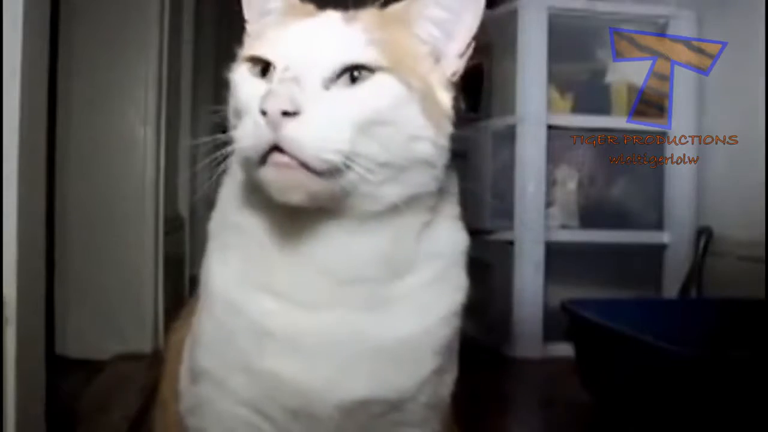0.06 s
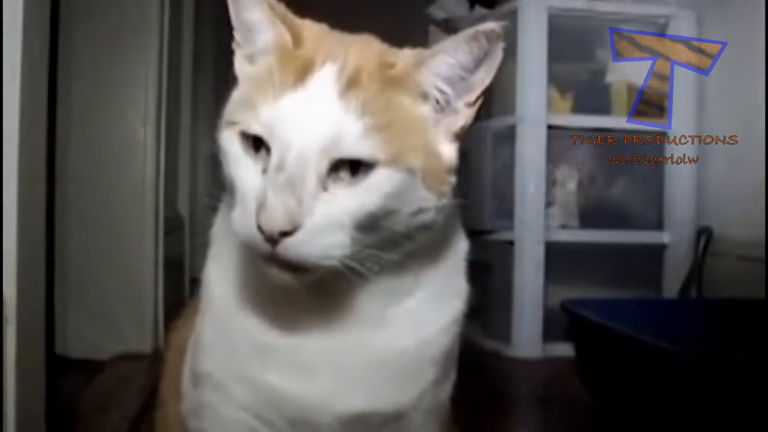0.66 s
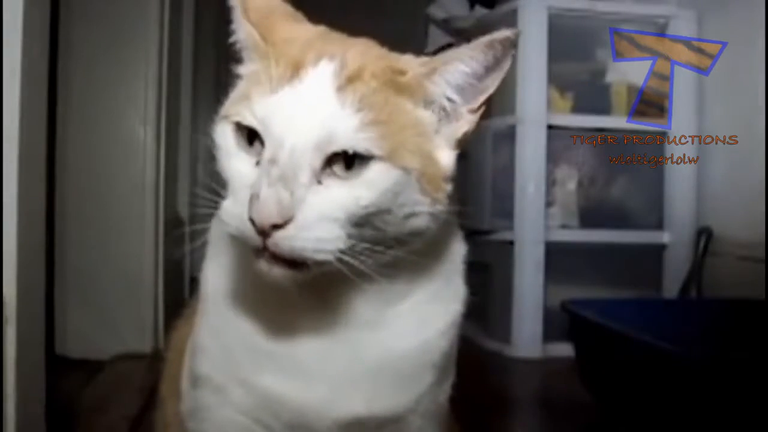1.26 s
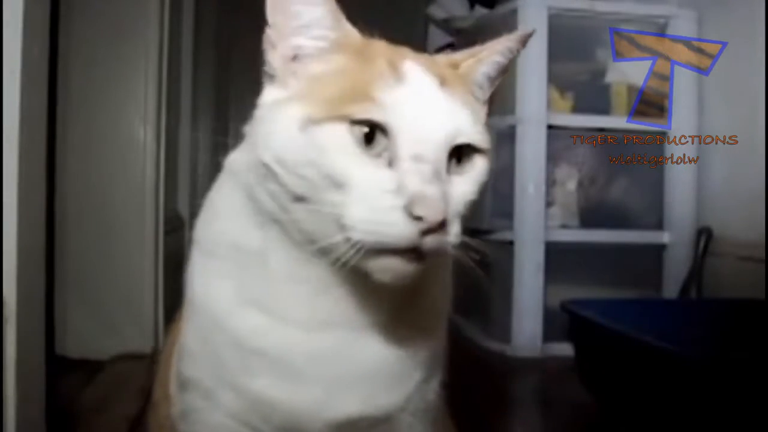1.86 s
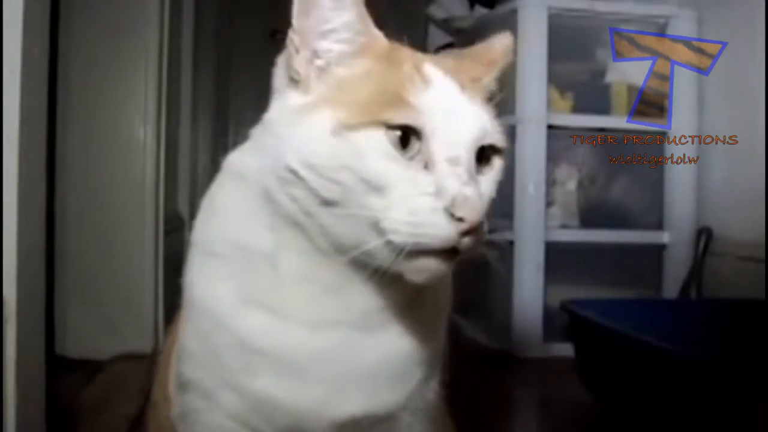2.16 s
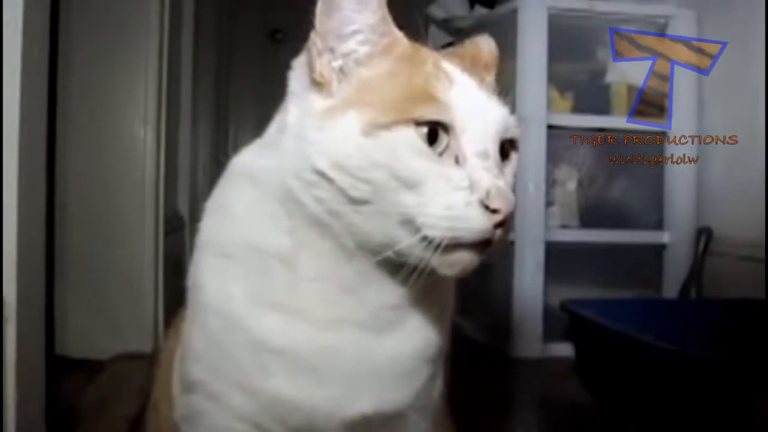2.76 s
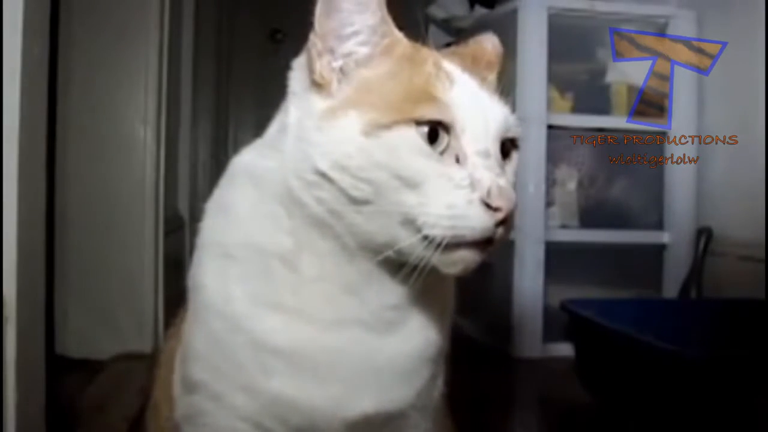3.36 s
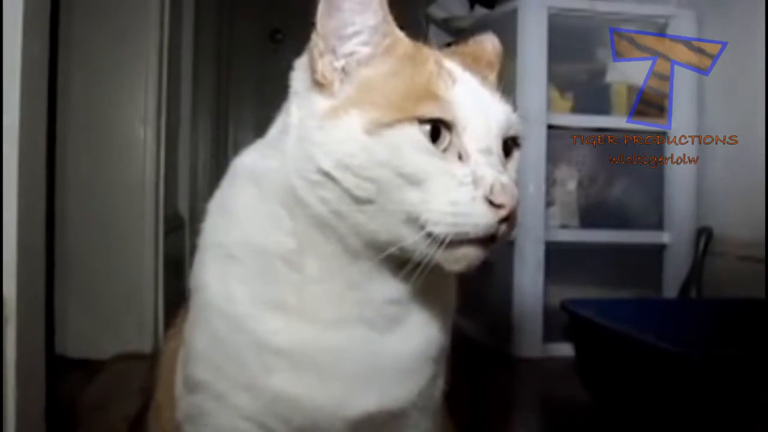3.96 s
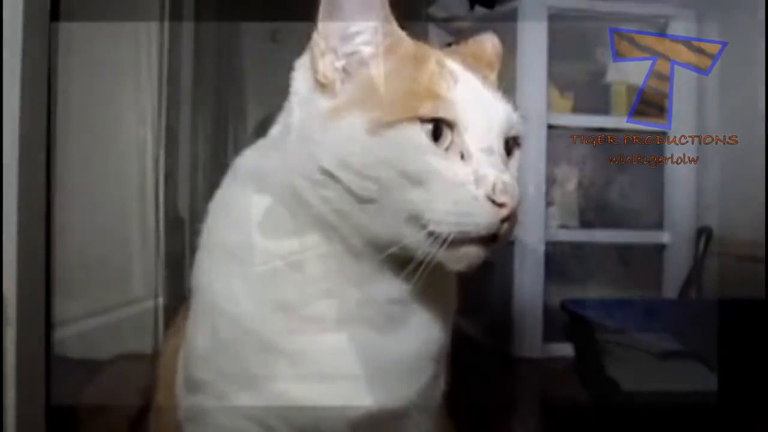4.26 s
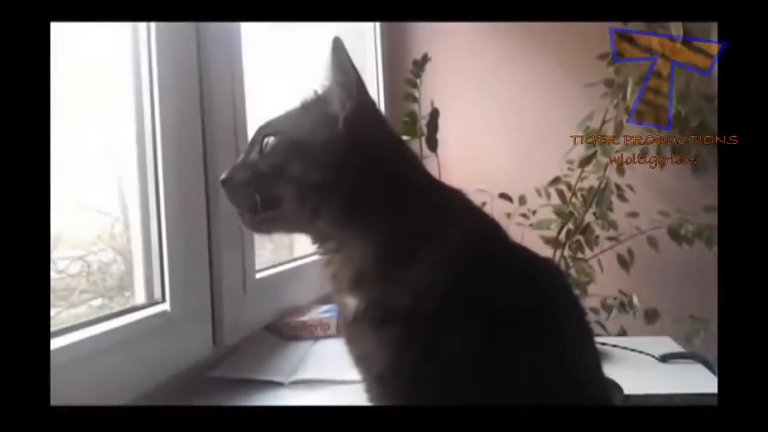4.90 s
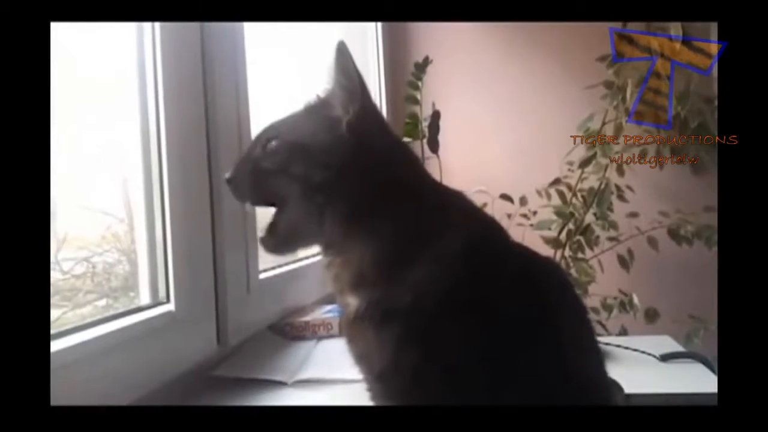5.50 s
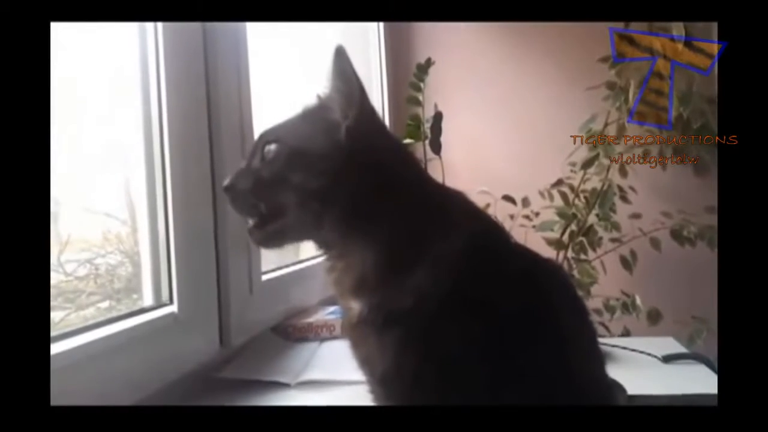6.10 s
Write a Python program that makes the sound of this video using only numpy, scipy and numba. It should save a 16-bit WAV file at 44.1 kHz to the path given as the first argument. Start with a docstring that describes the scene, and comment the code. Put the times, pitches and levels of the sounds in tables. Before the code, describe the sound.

A soft, breathy hiss opens over the low electrical hum of a small room. At about 0.25 seconds a nearby cat spits and starts one long, low yowl with a fluttering growl running through it. The pitch climbs until about 0.7 seconds and wavers. Around 1.2 to 1.5 seconds it drops into a brighter, raspier snarl, then turns low and muffled. It rises again near 1.9 seconds, makes two small "ow" shapes at about 2 and 2.5 seconds, and holds, gradually weakening, until it ends with a faint lip click at 3.9 seconds. From about 4.3 seconds the hum gives way to a wider, hissier room. There a second cat chatters more quietly: three short, high chirps between 4.3 and 4.9 seconds, a soft low bump at 5.4, then three more quick chirps from 5.8 to 6.2 seconds.

```python
"""A soft hiss over the mains hum of a small room, then a nearby cat spits and gives one long, low yowl.
Its vocal folds make the note, and a second, slower vibration in its voice box turns it into a growl.
Midway the jaw opens in a snarl, which makes the sound brighter and raspier.
The scene then fades to a hissier room, where another cat chatters at a window in short, high chirps."""
import sys
import numpy as np
from scipy import signal
from scipy.fft import rfft, irfft, next_fast_len
from scipy.io import wavfile
from scipy.ndimage import uniform_filter1d
from numba import njit

SR = 44100
rng = np.random.default_rng(int(sys.argv[2]) if len(sys.argv) > 2 else 0)


def to_wav(sig):
    """Store sig (one row per channel, or 1-D mono) as 16-bit WAV at the path in sys.argv[1].

    Samples outside -1..1 are clipped; the rate is SR.
    """
    pcm = np.clip(np.atleast_2d(sig), -1, 1) * 32767
    pcm = np.round(pcm).astype(np.int16)
    wavfile.write(sys.argv[1], SR, pcm.T)  # frames by channels


N = 275287
TIME = np.arange(N) / SR

# hum and faint whines of the first room (frequency [Hz], relative level [dB])
HUM_TONES = [(59.2, -37), (382.2, -50), (769.8, -55), (1152, -51.5), (1416, -63), (3472, -64.5),
             (4027, -75.5), (5534, -73), (6541, -79)]
# background noise of the first room and of the window room (frequency [Hz], relative level [dB])
FIRST_ROOM_NOISE = [(15, -5), (30, 0), (100, -2), (200, -5), (400, -11), (800, -13.5), (1400, -18.5),
                    (2000, -24.5), (3600, -25.5), (4500, -35.5), (15000, -39.5)]
WINDOW_ROOM_NOISE = [(15, -9.5), (60, -2.5), (140, -4), (300, -3), (600, -7.5), (1000, -13), (2000, -18.5),
                     (6000, -20.5), (15500, -24.5)]
# breath through the teeth (frequency [Hz], relative level [dB])
HISS_SPECTRUM = [(410, -26), (700, -2), (783, -6), (1460, -1), (1730, -11), (2130, 0), (2890, -14),
                 (3540, -10.5), (8000, -29), (10400, -59), (17600, -120)]
# tune of the yowl (time [s], pitch [Hz])
YOWL_PITCH = [(0.24, 112.6), (0.275, 135), (0.32, 141.3), (0.42, 203), (0.56, 233), (0.66, 309),
              (0.76, 292), (0.99, 274), (1.14, 283), (1.23, 235), (1.37, 197), (1.7, 206), (1.84, 231),
              (1.89, 272), (2.05, 285), (2.44, 285), (2.59, 263), (2.74, 274), (3.05, 278), (3.36, 290),
              (3.52, 276), (3.59, 260), (3.7, 256), (3.77, 230), (3.87, 232), (3.9, 185)]
# effort behind the yowl (time [s], chest level [dB], throat level [dB])
YOWL_EFFORT = [(0.23, -31, -49), (0.28, -6.5, -30), (0.38, -6.5, -30.5), (0.41, -10, -19),
               (0.57, -19.5, -12.5), (0.63, -10.5, -13), (0.68, -15.5, -15.5), (1.14, -11.5, -15),
               (1.17, -11, -10), (1.21, -20.5, -22), (1.39, -14, -27), (1.82, -17.5, -19.5),
               (1.87, -16.5, -16.5), (1.9, -10, -17), (1.98, -12.5, -12), (2.06, -15, -15.5),
               (2.41, -15.5, -17.5), (2.54, -14, -9.5), (2.61, -18, -11.5), (2.78, -15, -14.5),
               (3.24, -17, -22.5), (3.53, -15.5, -21.5), (3.59, -22, -21), (3.88, -22.5, -27.5)]
# the jaw: partly open, wide in the snarl, then two small "ow"s (time [s], opening [0 shut, about 1 wide])
JAW_OPENING = [(0.25, 0.26), (0.38, 0.29), (0.47, 0.5), (0.6, 0.39), (0.76, 0.25), (1.13, 0.15),
               (1.18, 0.7), (1.28, 1.05), (1.4, 0.9), (1.5, 0.4), (1.6, .06), (1.86, 0.15), (1.99, 0.36),
               (2.12, 0.3), (2.46, .24), (2.53, 0.41), (2.66, 0.33), (2.77, 0.18), (3.3, 0.12), (3.7, 0)]
# the mouth's three resonances, the frequencies it boosts
# (shut [Hz], wide open [Hz], curve between them [exponent], delay behind the jaw [s])
MOUTH_RESONANCES = [(816, 1024, 2.3, 0.071), (1747, 2600, 0.83, 0.0044), (3187, 4240, 1.71, .04)]
# the spit's hiss, its ring, the lips closing, a soft bump by the window
# (start [s], centre [Hz], width [Hz], decay [s], level [dB])
BURSTS = [(.242, 4980, 11000, 0.095, -43), (.25, 5520, 500, .11, -37), (3.885, 1980, 2400, 0.0054, -39),
          (5.38, 128, 40, 0.053, -30)]
# the second cat's chirps (start [s], crest [s], fade start [s], base pitch [Hz], glide [Hz/s],
# relative level [dB], swell at the crest [dB], rasp [0-1], hardness of the start [0-1])
CHIRP_NOTES = [(4.345, 4.443, 4.48, 532.3, 549, -42, 7.5, 0.39, 0),
               (4.598, 4.658, 4.7, 440.8, -39.5, -30, 3, 0.29, 0.98),
               (4.817, 4.865, 4.903, 460.4, -200, -27, 9, 0.24, .65),
               (5.848, 5.869, 5.924, 479.7, 300.5, -23.5, 4, .68, .6),
               (6.057, 6.114, 6.130, 546.5, 552, -30.5, 0, .18, 0),
               (6.133, 6.227, 6.2, 540, 4, -40.5, 3.5, 0.21, 0.04)]
# how its throat and mouth colour them (frequency [Hz], relative level [dB])
CHIRP_SPECTRUM = [(200, -14), (480, -18.5), (700, -31), (1000, -8), (1400, -16), (1980, 2), (2300, -6.5),
                  (2750, 0), (3300, -20), (4500, -28.5), (5900, -19), (7100, -16.5), (8500, -31),
                  (15000, -53)]

SPIT_START_S, SPIT_HOLD_S, SPIT_FADE_S = .24, .0801, .13


def undb(db):
    """Turn decibels into a gain to multiply by."""
    return 10 ** (np.asarray(db) / 20)


def curves(table):
    """Join each column of a table with straight lines in time."""
    times, *columns = np.transpose(table)
    return [np.interp(TIME, times, column) for column in columns]


def unit(x):
    """Scale to an average (rms) level of 1."""
    return x / np.sqrt(np.mean(x ** 2))


def even(x, span_s=.12):
    """Hold the level near 1 but keep the fast flutter."""
    size = int(span_s * SR)
    power = uniform_filter1d(uniform_filter1d(x ** 2, size), size)
    return x / np.sqrt(np.abs(power) + 1e-14)


def ramp(start_s, length_s):
    """Rise in a straight line from 0 to 1."""
    return np.clip((TIME - start_s) / length_s, 0, 1)


def dying(start_s, decay_s):
    """Stay at 1 until the start, then die away."""
    return np.exp(-np.maximum(TIME - start_s, 0) / decay_s)


def drift(rate):
    """Wander at random by about 1, turning `rate` times a second."""
    size = max(int(SR / rate), 1)
    steps = np.repeat(rng.standard_normal(N // size + 1), size)
    return unit(uniform_filter1d(steps, size)[:N])


@njit
def band_pass(x, tuning, damping):
    """Let through one band of frequencies, which may move."""
    out, band, low = np.empty(len(x)), 0., 0.
    for i in range(len(x)):
        g = tuning[i]
        swing = (band + g * (x[i] + 1e-18 - low)) / (1 + g * (g + damping[i]))
        band, low = 2 * swing - band, low + 2 * g * swing
        out[i] = damping[i] * swing
    return out


def resonance(x, hz, width_hz):
    """Pick out a band twice, so its edges are steep."""
    hz = np.clip(hz * np.ones(N), 20, .45 * SR)
    tuning, damping = np.tan(np.pi * hz / SR), width_hz / hz
    return band_pass(band_pass(x, tuning, damping), tuning, damping)


def keep_side(x, hz, side, order=4):
    """Keep what lies on the "low" or "high" side of a frequency."""
    return signal.sosfilt(signal.butter(order, hz, side, fs=SR, output="sos"), x)


def shaped(x, spectrum):
    """Colour a sound with a table of (frequency [Hz], level [dB])."""
    hz, db = np.transpose(spectrum)
    size = next_fast_len(N, True)
    bins_hz = np.maximum(np.fft.rfftfreq(size, 1 / SR), 1)
    gain = undb(np.interp(np.log(bins_hz), np.log(hz), db))
    return irfft(rfft(x, size) * gain, size)[:N]


def noise():
    """Plain white noise."""
    return rng.standard_normal(N)


def coloured(spectrum):
    """Noise at level 1 with the given spectrum."""
    return unit(shaped(noise(), spectrum))


def hiss():
    """Soft breath through the teeth, which stops as the yowl begins."""
    return undb(-40) * coloured(HISS_SPECTRUM) * (1 - ramp(.19, .058))


def first_room():
    """Mains hum and faint whines waver over low noise, then fade out."""
    wavering_time = TIME + .0006 * np.cumsum(drift(8.4)) / SR
    hum = sum(np.sqrt(2) * undb(db) * np.sin(2 * np.pi * hz * wavering_time) for hz, db in HUM_TONES)
    return (undb(2) * hum + undb(-40.5) * coloured(FIRST_ROOM_NOISE)) * (1 - ramp(4.6, .07))


def vocal_folds(phase, rasp, harmonics=24):
    """The folds buzz in sharp pulses, with a puff of rushing air in each cycle; more rasp is more air."""
    half = phase / 2 % np.pi + 1e-6
    pulses = unit(np.sin((2 * harmonics + 1) * half) / np.sin(half) - 1)
    air = unit(noise() * (1 + .31 * np.cos(phase)))
    rasp = np.clip(rasp, 0, 1)
    return pulses * np.sqrt(1 - rasp ** 2) + 1.6 * air * rasp


def voice_box(hz):
    """Rate, depth and rasp of the growl: on low notes the folds go slack and beat faster and deeper."""
    slack_below_hz, taut_rate_hz, slack_rate_hz = 244.5, 49.2, 57.16
    slack = .5 + .5 * np.tanh((slack_below_hz - hz) / 14)
    spit = dying(SPIT_START_S + SPIT_HOLD_S, SPIT_FADE_S)
    ease = 1 - .75 * ramp(3.03, .099) * (1 - .63 * slack)  # the breath runs out
    snarl = curves(JAW_OPENING)[0] ** 2
    rate_hz = taut_rate_hz + (slack_rate_hz - taut_rate_hz) * slack + 6 * np.sqrt(spit)
    depth = (.35 + .61 * slack) * ease * (1 - .7 * spit)
    rasp = .13 * (1 + slack) * np.sqrt(ease) + .7 * spit + .16 * snarl
    return rate_hz, depth, rasp


def jaw():
    """Two levels and three resonances of the mouth: opening it lets more out and tunes it higher."""
    opening = np.maximum(curves(JAW_OPENING)[0], .01)
    bared_teeth = dying(SPIT_START_S + SPIT_HOLD_S, SPIT_FADE_S)
    spit = undb(-30) * bared_teeth * ramp(SPIT_START_S - .003, .005)
    onset = ramp(SPIT_START_S, .01)
    parted = .5 + .5 * np.tanh((opening - .32) / .054)  # the treble jumps out as the lips part
    mid_gain = undb(-14.5) * opening ** 1.6 * onset
    bright_gain = undb(-36 + 5 * parted) * opening ** 1.204 * onset
    levels_db = [20 * np.log10(gain + 1e-6) for gain in (mid_gain, np.hypot(bright_gain, spit))]
    lips = opening + .36 * bared_teeth
    resonances_hz = [shut + (wide - shut) * np.interp(TIME - delay, TIME, lips) ** curve
                     for shut, wide, curve, delay in MOUTH_RESONANCES]
    return levels_db, resonances_hz


def chest(phase, growl, depth, rasp):
    """The deepest tone throbs in uneven strokes over a little breath noise."""
    throb = np.exp(.85 * depth ** 2 * (np.cos(growl) + .2 * drift(110)))
    breath = (.036 + .11 * rasp) * unit(resonance(noise(), 160, 290))
    return even(keep_side(np.cos(phase) * throb + breath, 82, "high"))


def throat_and_nose(buzz, hz, phase, rasp):
    """The throat's resonance rises with the pitch; faint clean overtones pass through the nose."""
    throat = keep_side(resonance(buzz, 315 + .7 * hz, 190), 682, "low")
    breath = .6 * rasp * unit(resonance(noise(), 505, 110))
    nose = resonance(vocal_folds(phase, rasp=0, harmonics=10), 1560, 600)
    return even(throat) + breath + undb(-32) * even(nose)


def mouth(buzz, rough_buzz, rasp):
    """The mouth shapes the buzz into a vowel, and the rougher buzz into a bright rasp above it."""
    (mid_db, bright_db), (first_hz, second_hz, third_hz) = jaw()
    mid = keep_side(resonance(buzz, first_hz, 220), 705, "high", order=6)
    mid = keep_side(mid + undb(-22) * resonance(buzz, 1400, 710), 1466, "low", order=8)
    gape = undb(np.clip(.9 * (bright_db + 43), -12, 0))  # a dropped jaw brings out the second resonance
    bright = gape * resonance(rough_buzz, second_hz, 330)
    for hz, width_hz, db in (third_hz, 400, -10.5), (5500, 510, -21), (6400, 730, -29.5):
        bright += undb(db) * resonance(rough_buzz, hz, width_hz)
    bright += undb(-37.5) * resonance(rough_buzz, 10500, 2500)
    # raspy air also leaks between the resonances
    bright += undb(-11) * np.minimum(rasp, .5) ** 2 * resonance(rough_buzz, 2300, 3800)
    return even(mid) * undb(mid_db - 1) + even(bright) * undb(bright_db + 3 * gape - 1)


def echoes(x, fade_s, level_db, top_hz):
    """A blur of echoes from near walls, falling 60 dB in fade_s."""
    t = TIME[:SR // 2]
    tail = keep_side(rng.standard_normal(len(t)), top_hz, "low", order=1)
    tail *= np.exp(-np.log(1000) * t / fade_s) * (t > .004)
    return undb(level_db) * signal.fftconvolve(x, tail / np.sqrt(np.sum(tail ** 2)))[:N]


def yowl():
    """A low, wavering note, shaken by the growl, sounds through chest, throat, nose and mouth."""
    hz = curves(YOWL_PITCH)[0] * (1 + .015 * drift(14))
    chest_db, throat_db = curves(YOWL_EFFORT)
    throat_db += 2 * drift(22) * (.45 + ramp(2.4, .6))  # the flutter grows as the cat tires
    growl_hz, depth, rasp = voice_box(hz)
    growl = 2 * np.pi * np.cumsum(growl_hz * (1 + .05 * drift(45))) / SR
    depth = np.clip(depth * (1 + .26 * drift(35)), 0, 1)
    jitter = .004 * drift(40) + .13 * rasp ** 2 * drift(250)
    # the growl sways both the timing and the strength of the pulses
    sway = np.cos(growl)
    phase = 2 * np.pi * np.cumsum(hz * (1 + jitter)) / SR + .58 * depth * sway
    body = chest(phase, growl, depth, rasp) * undb(chest_db)
    # the sharp closing of the folds sways further than their slow swing
    closing = phase + .36 * np.tanh(3 * depth) * np.cos(growl + .067)
    buzz = vocal_folds(closing, rasp) * (1 + .45 * np.tanh(.73 * depth) * sway)
    body += throat_and_nose(buzz, hz, phase, rasp) * undb(throat_db)
    rough_buzz = vocal_folds(closing, 2 * rasp + .34) * (1 + .18 * depth * sway)
    voice = body * ramp(.225, .009) + mouth(buzz, rough_buzz, rasp)
    voice *= 1 - ramp(3.89, .02)
    return voice + echoes(voice, fade_s=.22, level_db=-23, top_hz=3000)


def spit_lips_and_bump():
    """Each is a short burst of noise that swells quickly and dies away."""
    out = np.zeros(N)
    for start, hz, width_hz, decay_s, db in BURSTS:
        band = even(resonance(noise(), hz, width_hz))
        out += band * undb(db) * ramp(start, decay_s / 4) * dying(start, decay_s)
    return out


def window_room():
    """The second room's wide hiss fades in; its low part wavers."""
    side = undb(.4) * keep_side(coloured(WINDOW_ROOM_NOISE), 340, "high", order=1)
    centre = coloured(WINDOW_ROOM_NOISE)
    centre += .14 * drift(12) * keep_side(centre, 580, "low", order=1)
    return undb(-37.5) * np.array([centre + side, centre - side]) * ramp(4.316, .34) ** 1.24


def chirp_shapes():
    """Pitch, gain and rasp of the chirps: each switches on, arches to a crest and dies away."""
    rise_s, fall_s = .018, .008
    hz, gain, rasp = np.full(N, 500.), np.zeros(N), np.zeros(N)
    for start, crest, end, pitch, glide, db, swell_db, roughness, hardness in CHIRP_NOTES:
        arch = np.exp(-.5 * ((TIME - crest) / np.where(TIME < crest, rise_s, fall_s)) ** 2)
        snap = hardness * dying(start, .01)  # a hard start is briefly higher, raspier and louder
        note_hz = pitch + glide * (np.clip(TIME, start, end) - crest)
        hz = np.where(TIME >= start, note_hz * (1 + .075 * arch + .2 * snap), hz)
        rasp = np.where(TIME >= start, roughness + .55 * snap, rasp)
        on_off = ramp(start, .0015) * dying(end, .015)
        gain = np.maximum(gain, undb(db + swell_db * arch + 3.5 * snap) * on_off)
    return hz, gain, np.clip(rasp, 0, 1)


def chatter():
    """The second cat's folds buzz in short, high chirps; the room spreads them left and right."""
    hz, gain, rasp = chirp_shapes()
    jitter = .008 * drift(120) + .13 * rasp ** 2 * drift(350)
    phase = 2 * np.pi * np.cumsum(hz * (1 + jitter)) / SR
    buzz = vocal_folds(phase, rasp, harmonics=16)
    voice = even(shaped(buzz, CHIRP_SPECTRUM), span_s=.011) * gain
    voice += np.minimum(gain, undb(-44.5)) * (1 - rasp) * np.cos(phase)  # a hum through the nose
    left = undb(2.5) * voice + echoes(voice, fade_s=.39, level_db=-8, top_hz=8100)
    right = undb(-6) * voice + echoes(voice, fade_s=.14, level_db=-3.5, top_hz=8100)
    return np.array([left, right])


def scene():
    """Both cats over their rooms, in stereo."""
    return hiss() + first_room() + yowl() + spit_lips_and_bump() + window_room() + chatter()


def record(dry):
    """Clip any peaks at full scale, then cut the highest treble."""
    top_hz = 15600
    return signal.sosfilt(signal.ellip(14, .2, 80, top_hz, fs=SR, output="sos"), np.clip(dry, -1, 1))


dry = scene()
out = record(dry)
to_wav(out)
```